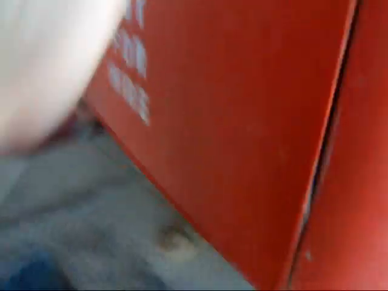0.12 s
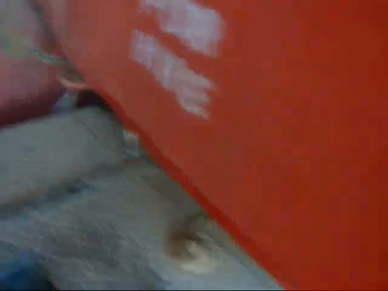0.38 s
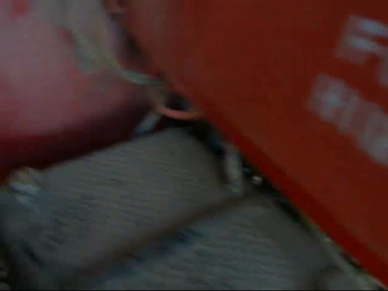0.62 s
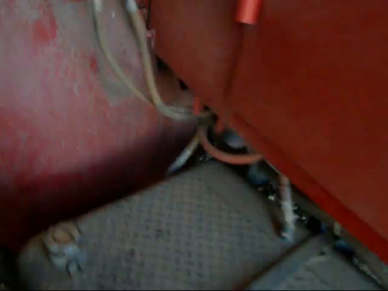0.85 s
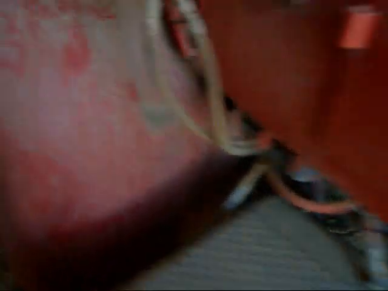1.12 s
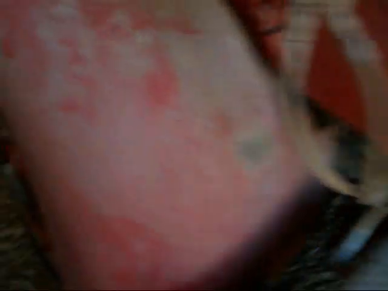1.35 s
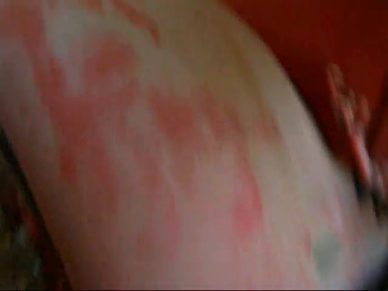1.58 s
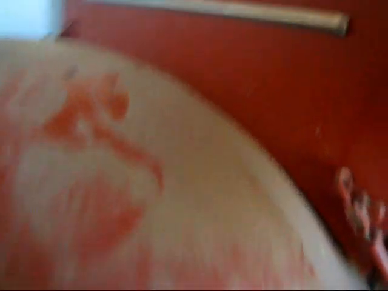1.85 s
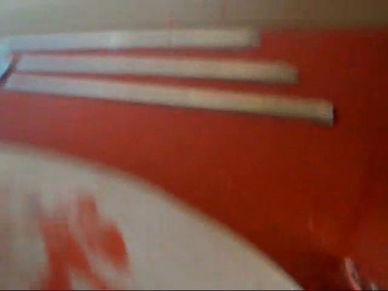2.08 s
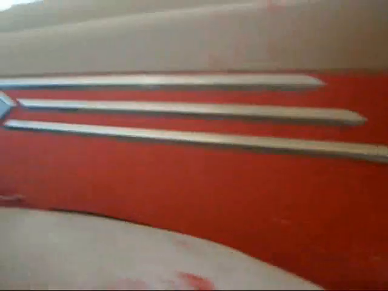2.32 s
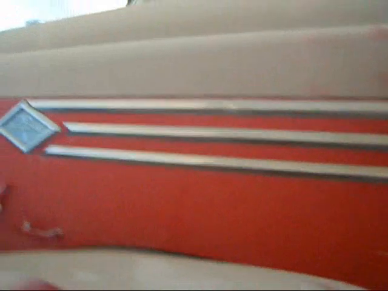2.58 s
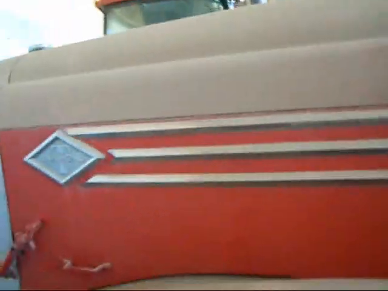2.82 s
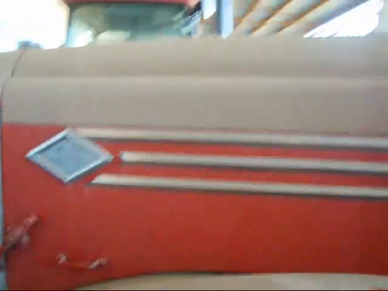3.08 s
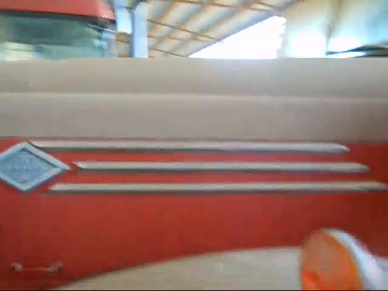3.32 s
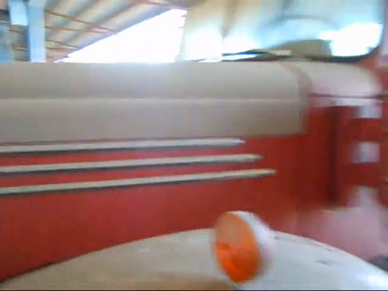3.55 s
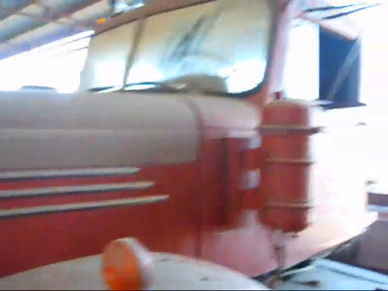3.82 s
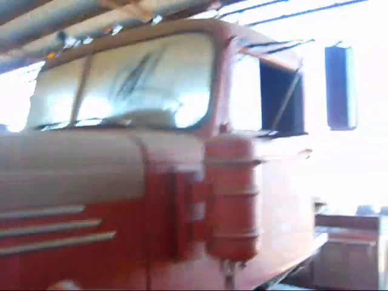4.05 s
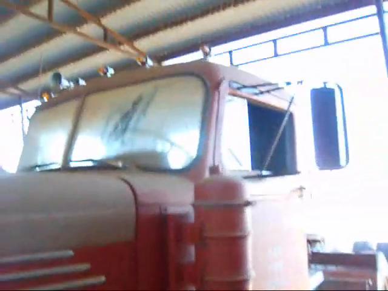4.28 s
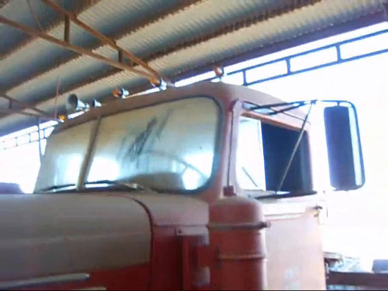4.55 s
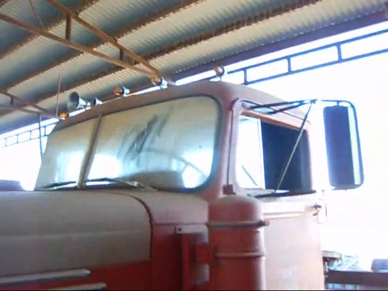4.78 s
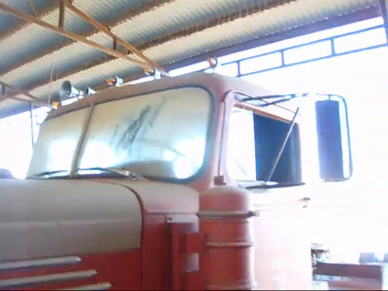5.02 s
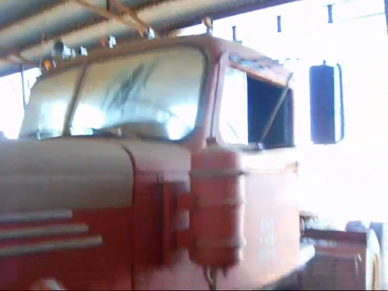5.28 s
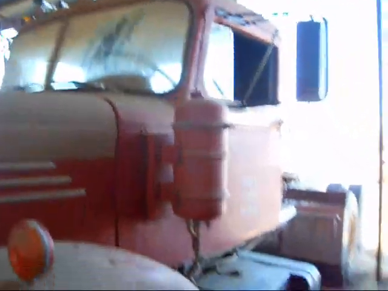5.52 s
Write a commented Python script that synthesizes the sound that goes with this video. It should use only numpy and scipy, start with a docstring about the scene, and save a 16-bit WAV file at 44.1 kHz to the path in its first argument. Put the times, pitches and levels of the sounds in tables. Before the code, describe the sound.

After a near-quiet first second, boots grind irregularly over loose gravel, then a small hollow knock leaves only steady soft hiss and faint rumble.

```python
"""Uneven footsteps crunch and scuff on gravel in an open shed: thousands of short ringing grains.
Single stones crack under the sole as noise bursts that ring or splinter; a hollow object is knocked.
The hand-held recorder rumbles as it is carried, and the tread adds to it: lumpy low noise.
A smooth hiss of coloured noise swells after the first second, dips, then stays.
A thin tone, a sine with fast wavering pitch, sounds in two pairs; dulled echoes follow stones and knocks."""
import sys
import numpy as np
from scipy import signal
from scipy.fft import rfft, irfft
from scipy.io import wavfile

SR = 44100
rng = np.random.default_rng(int(sys.argv[2]) if len(sys.argv) > 2 else 0)


def persist_wave(psi):
    """Save psi, clipped to +-1, as 16-bit WAV."""
    counts = np.round(np.clip(psi, -1, 1) * 32767).astype(np.int16)
    wavfile.write(sys.argv[1], SR, np.atleast_2d(counts).T)


def nominal_scale(level):
    """Amplitude ratio for a level in decibels (scalar or array-like)."""
    x = np.asarray(level, float) / 20
    return 10 ** x


N = 248988   # length in samples


def rms_one(x):
    """Scale to unit rms."""
    return x / np.sqrt(np.mean(x ** 2) + 1e-20)


def in_time(rows):
    """Columns of a curve, one value per sample; the last row holds."""
    s, *columns = np.transpose(rows)
    return [np.interp(np.arange(N) / SR, s, column) for column in columns]


def at_hz(points, hz):
    """Read a spectrum on a log-frequency axis."""
    point_hz, point_db = np.transpose(points)
    return np.interp(np.log(hz), np.log(point_hz), point_db)


def drift(rate_hz):
    """Slow random wandering with spread 1: noise smoothed by two equal poles."""
    r = np.exp(-2 * np.pi * rate_hz / SR)
    noise = rng.standard_normal(N + SR)
    return rms_one(signal.lfilter([1], [1, -2 * r, r * r], noise)[SR:])   # skip the filter's first second


def ring(clicks, hz, t60):
    """A unit click sets a sine of height 1 ringing; it falls 60 dB in t60 seconds."""
    r, w = nominal_scale(-60 / (t60 * SR)), 2 * np.pi * hz / SR
    return signal.lfilter([0, np.sin(w)], [1, -2 * r * np.cos(w), r * r], clicks + 1e-18)


def band(x, low_hz, high_hz):
    """Butterworth band-pass."""
    return signal.sosfilt(signal.butter(2, [low_hz, high_hz], "band", fs=SR, output="sos"), x)


CREST_S = 0.005   # how rounded the top of a scuff or jolt is


def swell(t, s, db, db_per_s):
    """Power that rises and falls at a steady rate about a rounded crest."""
    distance = np.hypot(t - s, CREST_S) - CREST_S
    return nominal_scale(db - db_per_s * distance) ** 2


# footfalls, setting in abruptly; the slow settling adds slightly to these levels:
# [start_s, hold_s, grit_db, coarse_above_grit_db, fine_above_grit_db]
FOOTFALLS = [(0, 0.015, -40.5, 1.5, -6.5), (.118, 0.0081, -64, 10, -31), (1.013, .04, -65.5, -3, -8),
             (1.127, 0.026, -63, -7, 3), (1.302, 0.004, -34, -6.5, -12), (1.346, 0.0049, -38, -8, -4),
             (1.371, 0.048, -29, -9, -5.5), (1.523, 0.021, -29.5, -18.5, -1.5),
             (1.853, 0.031, -40, -1, -16), (2.058, 0.062, -40.5, -12, -7), (2.36, 0.0068, -53, -18, 13.5),
             (2.412, 0.0074, -54, -17, 11), (2.642, 0.055, -39, 0.5, 0), (3.164, 0.0071, -47, 0, 0),
             (3.211, 0.092, -30.5, -1, -6), (3.421, 0.025, -32, -20, -8), (3.674, 0.007, -39.5, -20, 5),
             (3.849, 0.025, -26.5, -4, -7), (4.365, 0.01, -39.5, 0, -2.5)]
# how fast each layer lets go after the hold: coarse stones, grit, fine sand [release_db_per_s]
RELEASE = [192, 276, 258]
# scuffs: [loudest_s, grit_db, rise_and_fall_db_per_s, coarse_above_grit_db, fine_above_grit_db]
SCUFFS = [(1.2, -54.5, 252, -3.5, 0), (1.27, -53.5, 200, -5, 4.5), (1.475, -38, 245, -2, -1.5),
          (1.742, -40.5, 128, -2, -4), (2.111, -39, 158, -12, -21), (2.16, -39.5, 147, 3.5, -1),
          (2.235, -43, 160, 3, -12), (2.28, -44, 160, -3.5, -5.5), (2.5, -48, 98, 0, -0.5),
          (2.741, -36.5, 133, 0.5, -1), (2.798, -36.5, 214, -3.5, 3.5), (2.9, -51.5, 120, -3, 0),
          (3.1, -53.5, 100, -4, -0.5), (3.37, -38, 95, 3.5, -1.5), (3.48, -27.5, 141, -7.5, -20),
          (3.545, -24.5, 154, -17, -4.5), (3.622, -34.5, 167, -9, -6), (3.76, -47, 82, 2.5, -21),
          (3.925, -30, 129, -5.5, -6), (3.99, -39, 131, -1, -1), (4.045, -41, 158, -0.5, -11),
          (4.12, -51, 115, 4.5, -35), (4.29, -48, 98, -1, 0.5), (4.45, -51.5, 90, 0, -6)]
LANDING_S, SETTLING_DB, SETTLING_DB_PER_S = 0.0035, -31.5, 55.5   # settling starts below the footfall


def tread():
    """Levels of coarse stones, grit and sand: footfalls land, hold, let go and settle; scuffs swell and fade."""
    t, power = np.arange(0, N, 16) / SR, 1e-12
    release = np.array(RELEASE)[:, None]
    for s, hold, grit_db, coarse_db, fine_db in FOOTFALLS:
        after = np.maximum(t - s - hold, 0)
        landed = np.clip((t - s) / LANDING_S, 0, 1) if s > 0 else 1
        settling = nominal_scale(SETTLING_DB - SETTLING_DB_PER_S * after)
        shape = landed * (nominal_scale(-release * after) + settling)
        layer_db = grit_db + np.array([[coarse_db], [0], [fine_db]])
        power = power + (nominal_scale(layer_db) * shape) ** 2
    for s, grit_db, db_per_s, coarse_db, fine_db in SCUFFS:
        layer_db = grit_db + np.array([[coarse_db], [0], [fine_db]])
        power = power + swell(t, s, layer_db, db_per_s)
    return np.array([np.interp(np.arange(N) / SR, t, row) for row in np.sqrt(power)])


# loudness of each stone size against the others in its layer: [pitch_hz, relative_db]
STONE_COLOUR = [(150, -28), (300, 0), (600, -6.5), (1000, 0), (2000, 6), (3500, 8.5), (5000, 9.5),
                (7800, 5.5)]
GRAINS_PER_S, GRAIN_SPREAD_DB, CLUMP_DB = 6500, 2.5, 1.3
RING_CYCLES = 7.4   # cycles until a grain has fallen 60 dB
SLIPS_PER_S, SLIP_DB, SLIP_FADE_S = 80, -5.5, 0.0058
PATCHY_DB, PATCHES_PER_S = 1.5, 30   # each stone size comes and goes on its own


def crunch(levels):
    """Thousands of grains grind in clumps and sudden slips; each rings a few cycles at the pitch of its size."""
    strengths_db = GRAIN_SPREAD_DB * np.minimum(rng.exponential(1, N), 4.2)
    strengths = nominal_scale(strengths_db) * rng.choice([-1, 1], N)
    slips = np.minimum(rng.exponential(1, N), 2) * (rng.random(N) < SLIPS_PER_S / SR)
    # sudden start, quick fade
    slips = signal.lfilter([1], [1, -np.exp(-1 / (SLIP_FADE_S * SR))], slips)
    pressure = nominal_scale(CLUMP_DB * drift(34)) * (1 + nominal_scale(SLIP_DB) * slips)
    grains = strengths * pressure * (rng.random(N) < GRAINS_PER_S / SR)

    pitches = np.geomspace(160, 7800, num=28)
    share = np.sqrt(pitches)    # small grains are many
    dealt = rng.choice(28, N, p=share / share.sum())
    knots = np.arange(0, N + SR, SR / PATCHES_PER_S)
    patch_levels = nominal_scale(PATCHY_DB * rng.standard_normal((28, len(knots))))
    layers = np.zeros((3, N))
    for k, hz in enumerate(pitches):
        patches = np.interp(np.arange(N), knots, patch_levels[k])
        tone = rms_one(ring(grains * (dealt == k) * patches, hz, RING_CYCLES / hz))
        layer = np.searchsorted([950, 5000], hz)   # coarse stones, grit, fine sand
        layers[layer] += nominal_scale(at_hz(STONE_COLOUR, hz)) * tone
    return sum(level * rms_one(layer) for level, layer in zip(levels, layers))


# handling rumble as it is carried: [time_s, deep_db, upper_db]
RUMBLE = [(0, -33, -31.5), (.07, -42, -43), (.15, -45.5, -51.5), (.3, -51, -58.5), (.6, -57, -68.5),
          (1.05, -62.5, -76), (1.25, -50.5, -55), (1.6, -50.5, -55), (2.1, -55.5, -57), (2.5, -53.5, -67),
          (3.0, -54.5, -62), (3.3, -47.5, -57), (3.9, -50, -63), (4.3, -53, -61), (5.0, -51, -59),
          (5.65, -55.5, -63)]
# jolts of the hand, added to the rumble: [loudest_s, deep_db, upper_db]
JOLTS = [(.025, -32, -37), (.2, -51, -58), (.45, -40.5, -72), (1.33, -56, -41), (1.45, -56, -43),
         (1.55, -46, -40.5), (2.2, -54, -52), (3.045, -44, -62), (3.25, -44.5, -42), (3.69, -35.5, -58),
         (3.87, -52, -37), (3.95, -56, -38.5), (4.39, -42.5, -59)]
JOLT_DB_PER_S = 250
TREAD_THUD_DB = -17   # upper rumble added by the tread, against the coarse stones


def rumble(coarse_level):
    """Lumpy low noise in two bands from the hand and the tread; their powers add."""
    t = np.arange(N) / SR
    deep_db, upper_db = in_time(RUMBLE)
    jolts = sum(swell(t, s, np.array(db)[:, None], JOLT_DB_PER_S) for s, *db in JOLTS)
    deep_jolts, upper_jolts = jolts
    deep, upper = rng.standard_normal((2, N + SR))
    deep = rms_one(band(band(deep, 12.5, 62.0), 10.4, 66.5)[SR:])
    upper = rms_one(band(band(upper, 93, 158), 83, 330)[SR:])
    thud = nominal_scale(TREAD_THUD_DB) * coarse_level
    deep_level = np.sqrt(nominal_scale(deep_db) ** 2 + deep_jolts)
    upper_level = np.sqrt(nominal_scale(upper_db) ** 2 + upper_jolts + thud ** 2)
    return deep_level * deep + upper_level * upper


# loudness of the hiss: [time_s, level_db]
HISS = [(0, -68), (.25, -70.5), (.6, -73.5), (1.01, -75.5), (1.08, -63.5), (1.3, -48.5), (2.0, -43.5),
        (2.6, -51), (3.0, -46), (3.8, -42), (4.5, -42.5), (5.65, -41.5)]
# colour of the hiss, only relative: [pitch_hz, db_per_hz]
HISS_COLOUR = [(20, -9.5), (200, -3), (700, -4), (1500, -6.5), (3000, -9), (6200, -11.5), (8500, -11)]


def hiss():
    """Smooth noise, falling towards the treble."""
    hz = np.maximum(np.fft.rfftfreq(N, 1 / SR), 1)
    colour = nominal_scale(at_hz(HISS_COLOUR, hz)) * (hz > 15)
    noise = irfft(rfft(rng.standard_normal(N)) * colour, N)
    return nominal_scale(in_time(HISS)[0]) * rms_one(noise)


# early echoes from the ground and nearby panels: [delay_s, level_db]
ECHOES = [(.0043, -68), (.0091, -20.5), (0.0114, -14), (.019, -15.5), (0.025, -28), (0.035, -29),
          (.047, -18.5)]


def shed(x):
    """A few delayed copies, dulled by a band-pass, follow the direct sound."""
    dull, out = band(x, 210, 12000), x.copy()
    for s, db in ECHOES:
        lag = round(s * SR)
        out[lag:] += nominal_scale(db) * dull[:N - lag]
    return out


# single stones cracking, and near 1.83 to 1.85 s a kicked stone knocking three times; peaks before the low cut
# and echoes; bright_share is the splinters' part, 0 to 1: # [start_s, peak_db, low_ring_hz, high_ring_hz,
# bright_share]
CRACKS = [(0.123, -33.5, 1410, 2800, 0.23), (1.03, -51, 1710, 3150, 0.2), (1.126, -42, 770, 3150, 0.88),
          (1.305, -14, 2710, 3830, 0.22), (1.348, -13.5, 2850, 2960, 0.48), (1.372, -24, 2700, 3800, 0.5),
          (1.405, -17, 800, 3060, 0.85), (1.475, -31, 1910, 3505, 0.8), (1.647, -19, 2900, 3670, 0.9),
          (1.791, -17.5, 2710, 3800, 0.34), (1.827, -6.5, 1200, 4180, 0), (1.8512, -13, 870, 3440, 0.36),
          (1.8532, -5.5, 2500, 3450, 0.35), (1.926, -23, 735, 6400, 0.55), (2.059, -40, 1710, 3700, 0.4),
          (2.125, -21, 2490, 3230, 0.5), (2.178, -27, 1300, 5260, 0.5), (2.36, -21.5, 748, 5400, 0.8),
          (2.415, -24, 3060, 4110, 0.93), (2.422, -25, 2700, 4200, 0.8), (2.494, -30, 1560, 4860, 0),
          (2.644, -15, 2770, 4620, 0.6), (2.662, -24, 750, 4575, 0.7), (2.894, -29, 1544, 6060, 0.73),
          (3.086, -32, 1140, 5550, 0), (3.166, -26.5, 980, 3975, 0.55), (3.209, -22.5, 1433, 3050, 0.52),
          (3.424, -18, 2280, 3530, 0.1), (3.455, -11.5, 2550, 3740, 0.15), (3.476, -15, 1060, 4660, 1),
          (3.514, -18, 915, 4530, 0.56), (3.569, -11, 1980, 3500, 1), (3.6734, -11, 2920, 3520, 1),
          (3.849, -23, 2510, 3110, 0.8), (3.862, -14, 880, 3040, 0.32), (3.931, -19, 2700, 3190, 0.1),
          (4.047, -20, 900, 3330, 0.2), (4.379, -21.5, 799, 3300, 0.05)]
CRACK_T60_S = 0.021   # time for the burst to fall 60 dB


def cracks():
    """Each crack: one hard snap, then splinters dying fast; part of it rings at two pitches of the stone."""
    out, t = np.zeros(N), np.arange(SR // 8) / SR
    noises = rng.standard_normal((len(CRACKS), len(t)))
    for (s, peak_db, low_hz, high_hz, bright), noise in zip(CRACKS, noises):
        burst = noise * nominal_scale(-60 * t / CRACK_T60_S)
        burst[0] = -nominal_scale(15.5)    # the snap
        body = ring(burst, low_hz, 5 / low_hz) + .7 * ring(burst, high_hz, 9 / high_hz)
        splinters = band(burst, 2250, 7200)
        body_part = (1 - bright) * body / abs(body).max()
        bright_part = bright * splinters / abs(splinters).max()
        shape = body_part + bright_part
        at = round(s * SR)
        out[at:at + len(t)] += nominal_scale(peak_db) * shape / abs(shape).max()
    return out


# a faint wavering tone; pitch at its start, level before the flicker: [start_s, length_s, pitch_hz, peak_db]
THIN_TONE = [(1.675, 0.23, 1710, -50.5), (1.877, 0.35, 1700, -52), (3.661, 0.31, 1720, -48.5),
             (3.979, 0.24, 1650, -49)]
TONE_FADE_S, TONE_SAG_HZ_PER_S = .05, 150


def thin_tone():
    """A narrow whistle sags as it sounds: its pitch wavers fast and its level flickers."""
    t, out = np.arange(N) / SR, np.zeros(N)
    waver, flicker = 1 + .02 * drift(60), nominal_scale(4 * drift(30))
    for s, length, hz, db in THIN_TONE:
        fade = np.clip(np.minimum(t - s, s + length - t) / TONE_FADE_S, 0, 1)
        pitch = (hz - TONE_SAG_HZ_PER_S * (t - s)) * waver
        out += nominal_scale(db) * fade * flicker * np.sin(2 * np.pi * np.cumsum(pitch) / SR)
    return out


# a hollow object is knocked; the click is 14.5 dB below this strength: [start_s, strength_db]
KNOCKS = [(4.365, -19), (4.377, -22)]
# ringing modes of the hollow object, against the click: [pitch_hz, relative_db, t60_s]
HOLLOW = [(800, 5, 0.15), (733, -6.5, 0.37), (1044, 10.5, 0.026), (1220, -27, 0.079), (328, -14, 0.043)]


def knocks():
    """Each knock is a click that strikes the same few modes."""
    clicks = np.zeros(N)
    for s, strength_db in KNOCKS:
        clicks[round(s * SR)] = nominal_scale(strength_db - 14.5)
    return sum(nominal_scale(db) * ring(clicks, hz, t60) for hz, db, t60 in HOLLOW)


def scene():
    """Steps in the shed with the thin tone, over rumble and hiss."""
    levels = tread()
    # the stones and cracks are cut below about 184 Hz
    low_cut = signal.butter(2, 184, "high", fs=SR, output="sos")
    stones = signal.sosfilt(low_cut, crunch(levels) + cracks())
    mix = shed(stones + knocks()) + thin_tone() + rumble(levels[0]) + hiss()
    return mix[None]   # one channel


def roll_off(x):
    """The treble ends steeply here."""
    return signal.sosfilt(signal.butter(12, 16700, fs=SR, output="sos"), x)


def record(dry):
    """Sampled at 16 kHz, each sample simply held until the next: the band below 8 kHz is mirrored above it."""
    guard = signal.cheby2(9, 25, 8025, fs=SR, output="sos")   # low-pass before sampling
    at_48k = signal.resample_poly(signal.sosfilt(guard, dry), 480, 441, axis=1)
    sampled = at_48k[:, ::3]
    held = sampled[:, np.arange(N) * 160 // 441]
    top_cut = signal.ellip(10, .3, 40, 15730, fs=SR, output="sos")   # low-pass
    return roll_off(signal.sosfilt(top_cut, held))


dry = scene()
out = record(dry)
persist_wave(out)
```